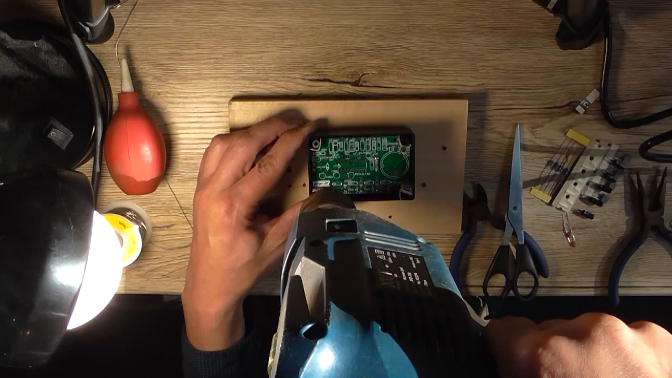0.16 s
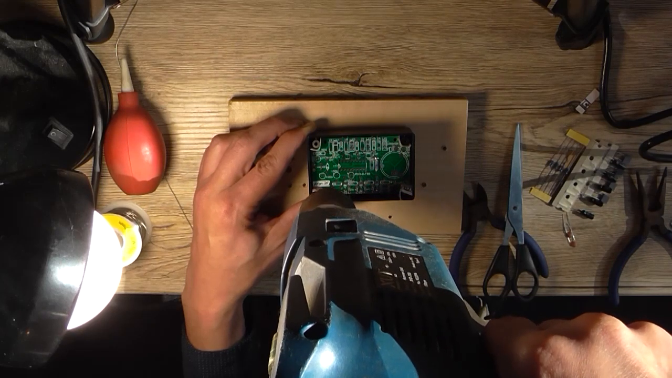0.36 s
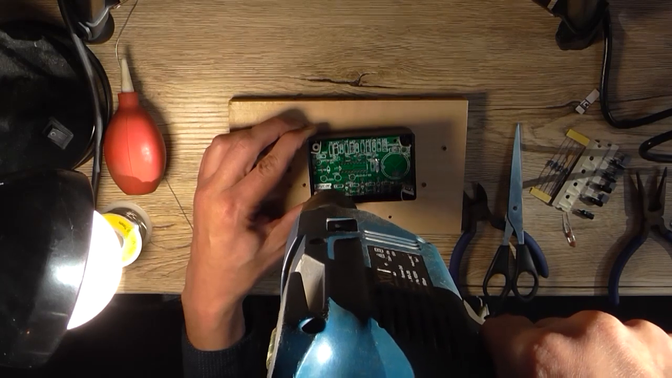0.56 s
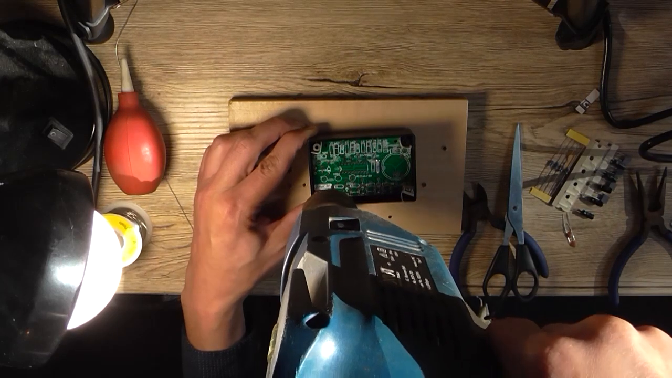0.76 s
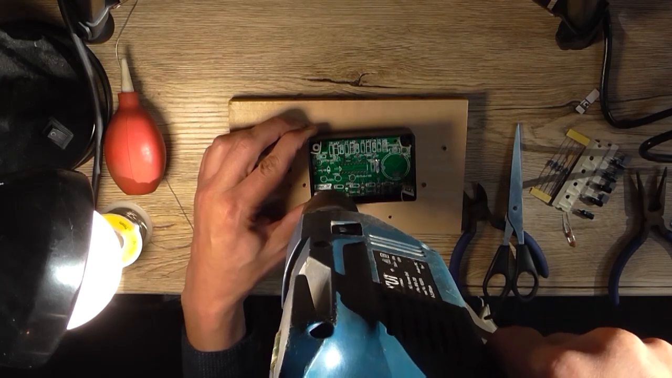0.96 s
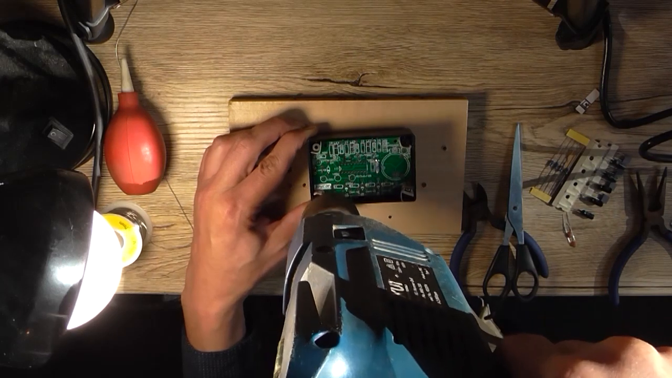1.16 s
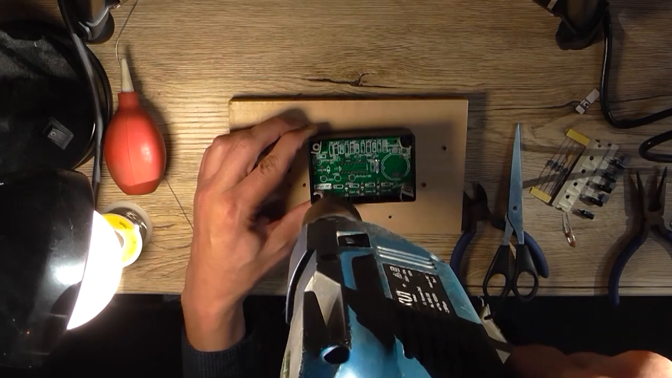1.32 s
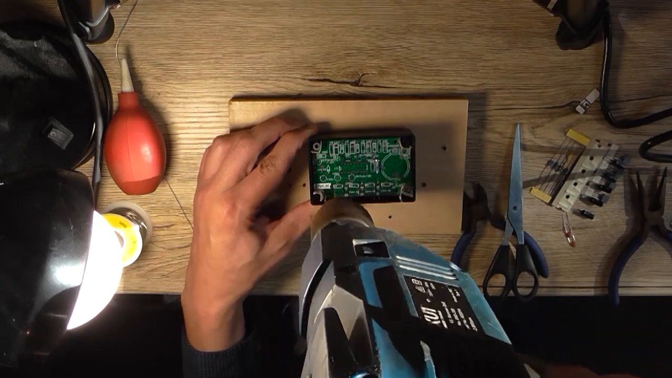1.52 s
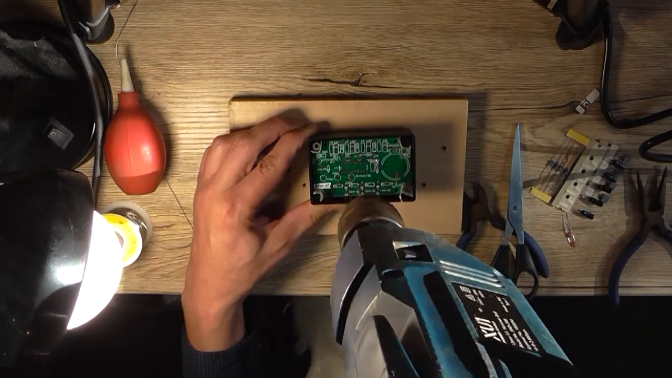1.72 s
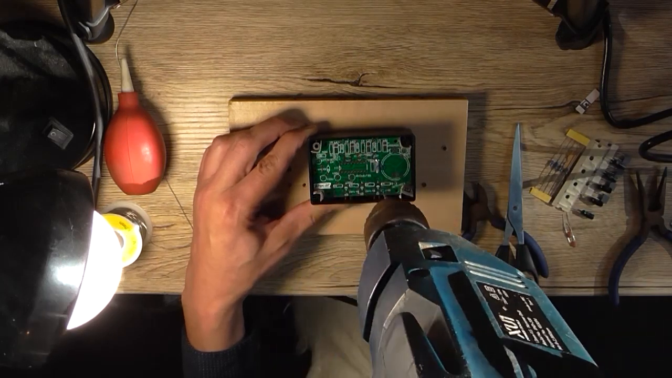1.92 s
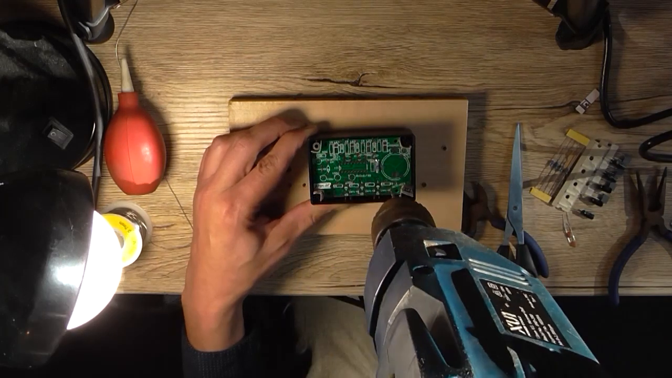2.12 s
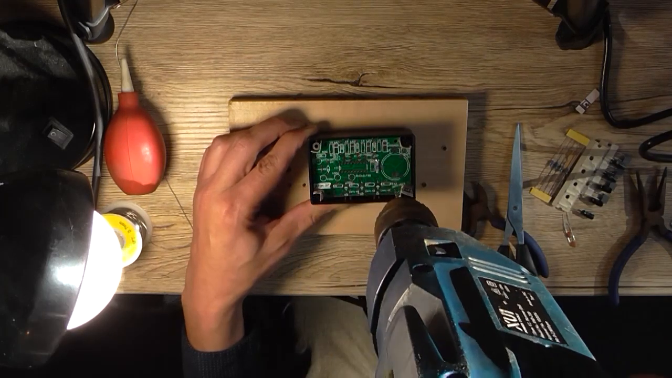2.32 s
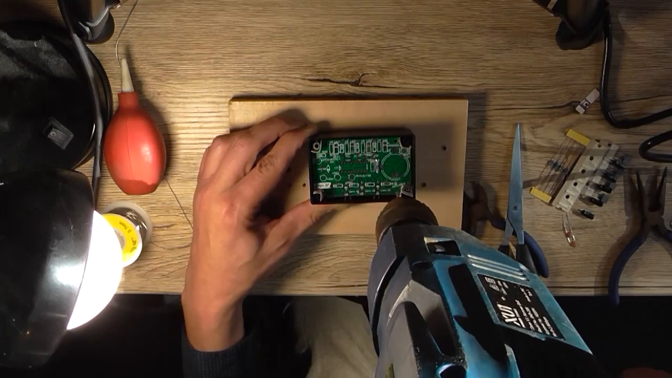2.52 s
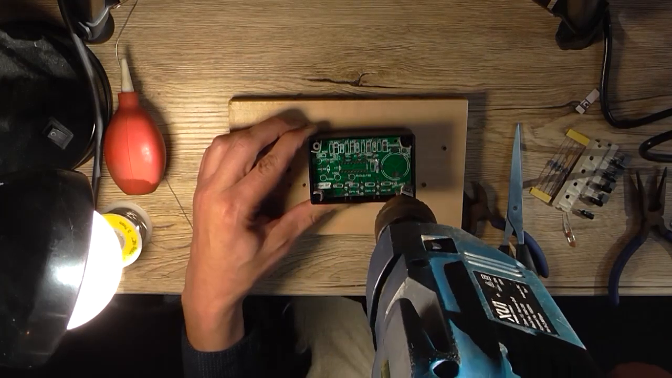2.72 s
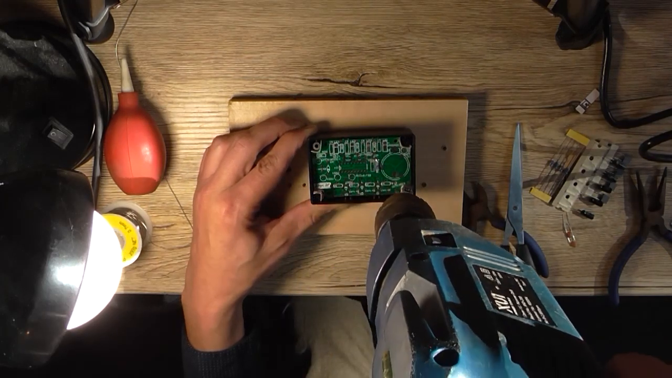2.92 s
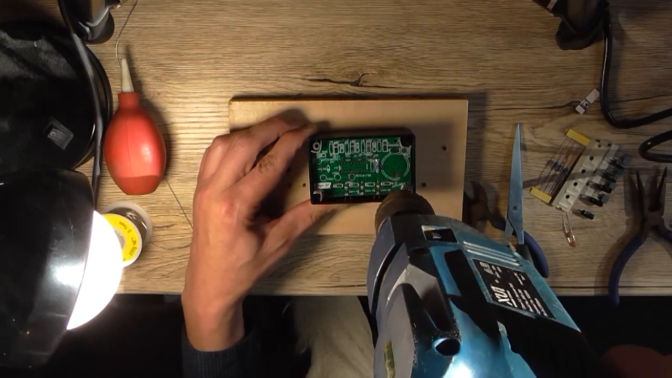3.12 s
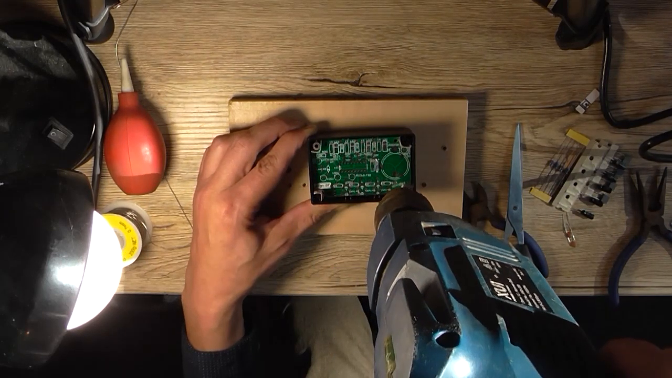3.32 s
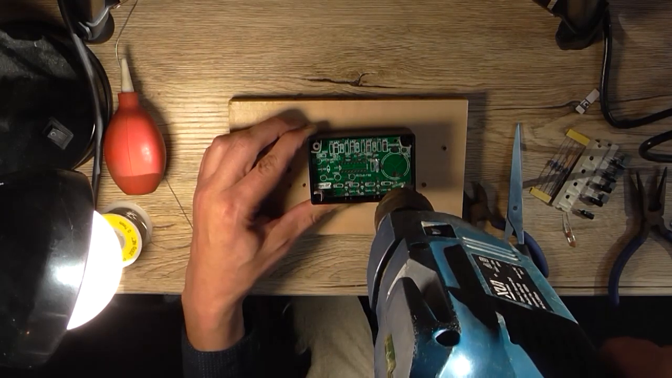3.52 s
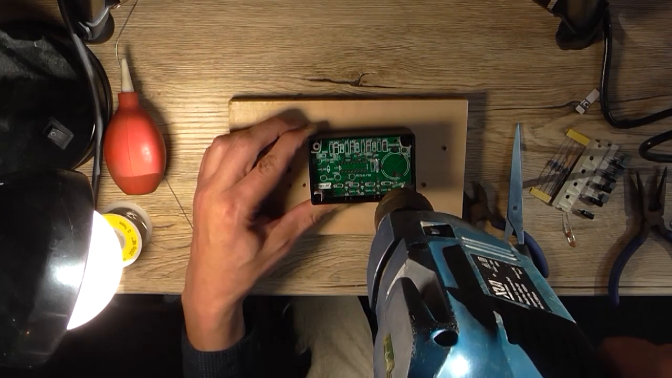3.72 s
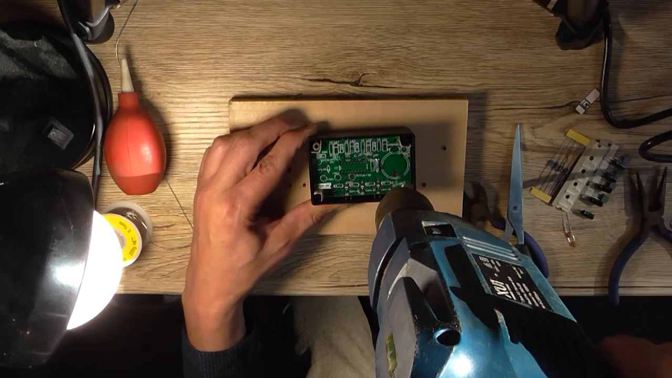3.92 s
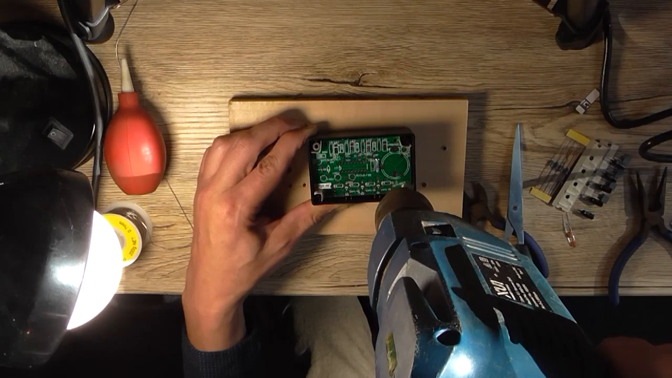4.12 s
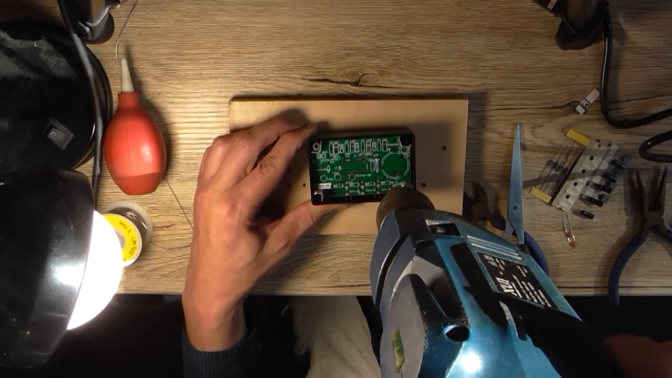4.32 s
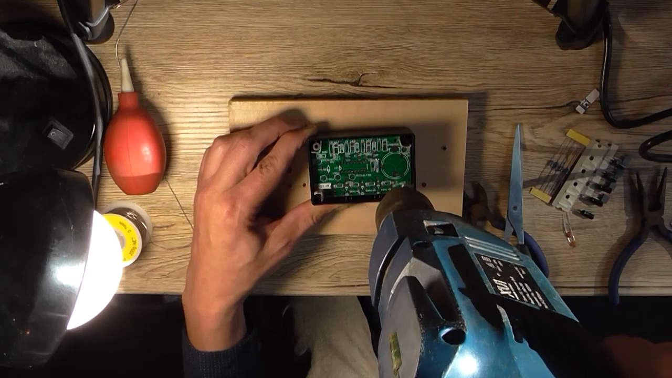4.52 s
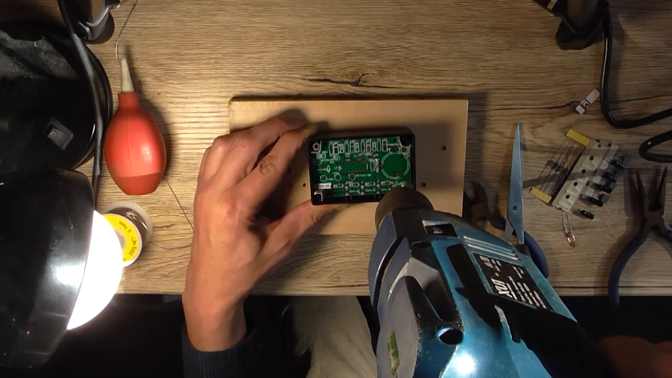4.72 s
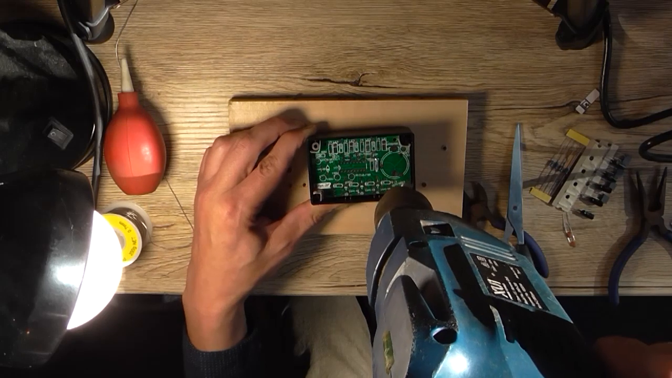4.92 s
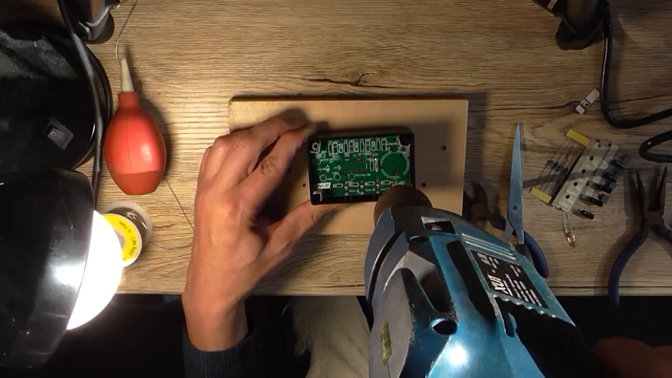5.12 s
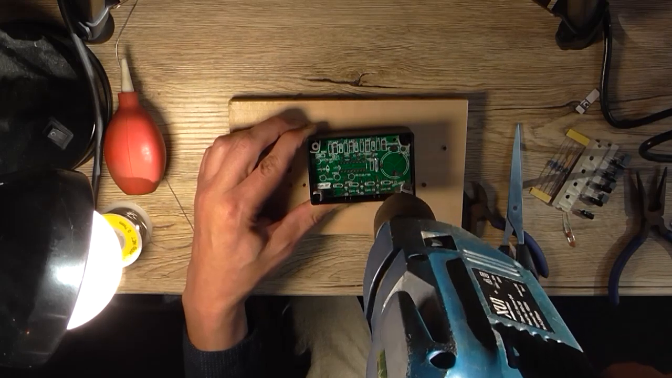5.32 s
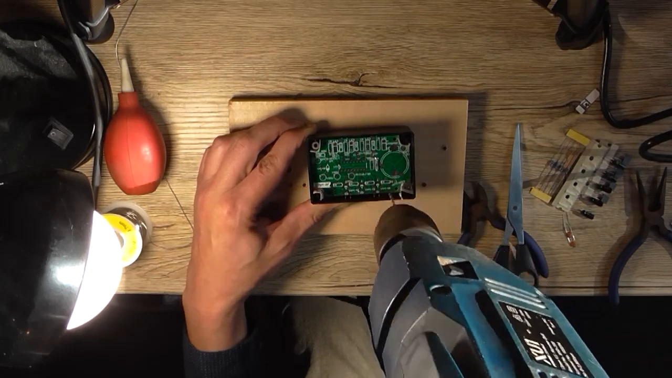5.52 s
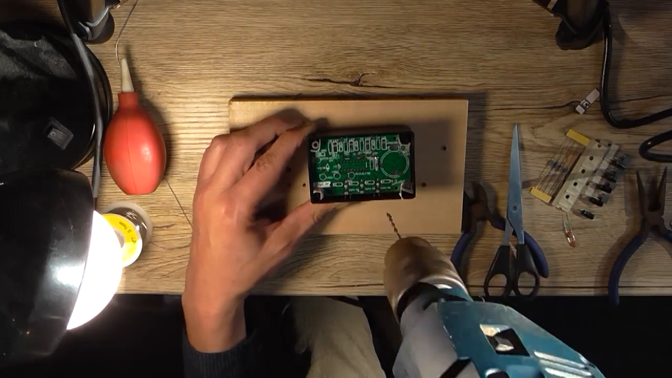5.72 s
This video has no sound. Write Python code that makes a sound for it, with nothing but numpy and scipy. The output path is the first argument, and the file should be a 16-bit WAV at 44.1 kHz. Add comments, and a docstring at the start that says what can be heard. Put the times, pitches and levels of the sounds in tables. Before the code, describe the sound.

A corded electric drill whines up and coasts down while boring a plastic box, then scrapes, knocks on the bench, and drills again.

```python
"""At a wooden bench, a corded hand drill bores a plastic box in two bursts, close to the microphones. Gear
teeth and armature slots whine through the housing as the rotor speeds up and coasts: sines locked to its turns,
over resonant noise. The loaded bit shakes the bench as low noise. Between the bursts the bit scrapes over the
box (grainy noise swells) and the drill is set down (ringing wood modes). Jolts, a faint two-band hiss that
swells near 2 s, and room noise with mains hum complete it."""
import sys
import numpy as np
from scipy import signal
from scipy.fft import rfft, irfft, next_fast_len
from scipy.io import wavfile
from scipy.ndimage import uniform_filter1d, map_coordinates

SR = 44100
rng = np.random.default_rng(int(sys.argv[2]) if len(sys.argv) > 2 else 0)


def transcribe(u):
    """Save the signal u as a 16-bit wav file named by the first command-line argument.

    u: samples, shape (n,) or (channels, n), limited to [-1, 1]; the rate is SR.
    q: integer samples, one column per channel.
    """
    v = np.clip(np.atleast_2d(u).T, -1, 1)
    q = np.round(v * 32767).astype(np.int16)
    wavfile.write(sys.argv[1], SR, q)


N = 253575
HOP, SIZE = 256, 1024  # STFT, samples
T = np.arange(N // HOP + 5) * HOP / SR  # frame times, s
HZ = np.fft.rfftfreq(SIZE, 1 / SR)  # bin frequencies
FULL_MESH_HZ = 700  # gear mesh at full speed
PINION_TEETH = 5
# resonances of housing, box and bench: (frequency [Hz], width [Hz], lift [dB])
BODY = [(129, 8.3, 12.5), (200, 21, 7.5), (260, 27, -8.5), (300, 72, -2.5), (344, 6.7, -6), (459, 45, 8.5),
        (578.3, 21.3, 16.5), (695, 8.9, 2), (1290, 150, 4.5), (1650, 130, 6), (1940, 19, 6.5),
        (2205, 66, 9.5), (2885, 15.5, 5), (3382, 33, 9), (7030, 27, 1.5), (7770, 280, 4)]


def amp(db):
    """Decibels to gain."""
    return 10 ** (np.asarray(db) / 20)


def evened(x):
    """Scales to rms 1."""
    return x / np.sqrt(np.mean(x ** 2) + 1e-20)


def read(points, hz):
    """Reads a spectrum table on a log frequency axis."""
    f, value = np.transpose(points)
    return np.interp(np.log(hz + 1), np.log(f + 1), value)


def colour(spectrum, modes):
    """Power per bin, sum 1: a broad spectrum lifted at each resonance."""
    lift_db = sum(db / (1 + (2 * (HZ - hz) / width) ** 2) for hz, width, db in modes)
    power = amp(read(spectrum, HZ) + lift_db) ** 2
    return (power / power.sum())[:, None]


def curve(tables, t):
    """The tables of one control, joined over time."""
    s, value = np.vstack(tables).T
    return np.interp(t, s, value)


def wander(count, frames):
    """Smoothed random drift of rms 1, one row a source."""
    drift = rng.standard_normal((len(T), count))
    return evened(uniform_filter1d(drift, max(round(frames), 1), 0)).T


def noise(power, patchy_db, wide=1):
    """Stereo noise from a bins x frames power field with drifting patches."""
    # (frequency [Hz], left-right likeness [0-1])
    likeness = [(60, 0.9), (100, 0.89), (180, 0.72), (310, 0.72), (550, 0.89), (950, 0.58), (1650, 0.89),
                (2860, 0.93), (4970, 0.96), (8640, 0.82), (15000, 0.66)]
    a, b, c, d, patches = rng.standard_normal((len(T), len(HZ), 5)).T
    patches = evened(uniform_filter1d(uniform_filter1d(patches, 10, 0), 8, 1))
    same = read(likeness, HZ)[:, None] ** wide
    left, other = a + 1j * b, c + 1j * d
    pair = np.array([left, same * left + np.sqrt(1 - same ** 2) * other])
    pair = pair * np.sqrt(power) * amp(patchy_db * patches)
    sound = signal.istft(pair, nperseg=SIZE, noverlap=SIZE - HOP)[1][:, :N]
    return sound * np.sqrt(3 / 2)  # overlap of independent frames loses power


def drill_controls():
    """Gear mesh frequency, bit load and motor current per frame."""
    # rotor speed, one table a burst: (time [s], gear mesh [Hz])
    speed = [
        [(0.0, 178.3), (0.058, 160.3), (0.112, 209.5), (0.28, 394), (0.48, 565.2), (0.69, 669.5),
         (0.788, 704.5), (0.88, 657), (1.29, 369.8), (1.62, 199.6), (1.94, 64.7)],
        [(3.892, 203.4), (4.03, 270.8), (4.144, 335.5), (4.29, 245), (4.42, 181.5), (4.46, 187.8),
         (4.54, 275.1), (4.662, 383), (4.848, 543.9), (5.076, 649.6), (5.304, 743), (5.408, 743),
         (5.682, 541.6), (5.75, 507)],
    ]
    # how hard the bit bites, one table a burst: (time [s], load [0-1])
    bite = [
        [(0.0, 0.67), (0.13, 1), (0.33, 0.81), (0.56, 0.73), (0.78, 0.7), (0.9, 0.31), (1.4, 0.16), (1.94, 0)],
        [(3.892, 0.22), (4.02, 0.74), (4.15, 0.51), (4.22, 0.64), (4.5, 0.94), (4.75, 0.7), (5.23, 0.59),
         (5.29, 0.45), (5.75, 0.01)],
    ]
    # current flows: (from [s], to [s])
    trigger = [(.06, .82), (3.89, 3.93), (4.44, 5.3)]
    mesh_hz = uniform_filter1d(curve(speed, T), size=7)  # the rotor's mass rounds the turns
    current = uniform_filter1d(sum((T > a) & (T < b) for a, b in trigger) * 1., 5)
    return mesh_hz, curve(bite, T), current


def drill_field(mesh_hz, load, current, octaves):
    """Power of whirr, gearbox drone and shaken bench, all shaped by the body resonances."""
    # spectra: (frequency [Hz], relative level per Hz [dB])
    whirr = [(1290, -69), (2200, -42), (2490, -31), (2850, -10.5), (3390, -6), (3740, -4), (4610, -0.5),
             (6160, -3), (8510, -9.5), (12100, -4), (14100, -13.5), (15200, -11.5), (16000, -26)]
    drone = [(24, -77), (40, -26), (123, -23.5), (162, -29), (187, -8), (246, -16), (298, -1.5), (379, -25),
             (584, -1.5), (707, -3.5), (798, -7), (932, -8.5), (1490, -6.5), (2210, -14.5), (2500, -13),
             (3250, -12), (5500, -120)]
    bench = [(35, -56), (60, -44), (124, -42.5), (161, -50), (189, -13), (220, -21), (286, 6.5), (343, 2.5),
             (422, 2.5), (493, -16.5), (520, -18.5), (680, -34), (1140, -120)]
    # (gear mesh [Hz], whirr level [dB] without current at full-speed tilt)
    whirr_by_speed = [(65, -70), (100, -46.5), (145, -33), (190, -29), (290, -26.5), (450, -27),
                      (740, -27.5)]
    whirr_db = read(whirr_by_speed, mesh_hz) + 1 * current
    bin_hz = HZ[:, None]
    tilt_db = 2.0 * np.log2(np.maximum(bin_hz, 1) / 5000) * octaves.clip(-2.1)  # fast air is brighter
    rattle_db = -4.9 * octaves.clip(-1.1) / (1 + ((bin_hz - 4600) / 600) ** 2)  # slow teeth, housing
    growl_db = -3 * octaves.clip(-1.5) / (1 + ((bin_hz - 640) / 90) ** 4)  # slow gearbox
    drone_db = whirr_db + growl_db - 11 + 5.5 * load
    bench_db = -63.5 + 38.5 * load
    field = colour(whirr, BODY) * amp(whirr_db + tilt_db + rattle_db + 0.17 * wander(1, 4)) ** 2
    field += colour(drone, BODY) * amp(drone_db + 1.0 * wander(1, 5)) ** 2
    return field + colour(bench, BODY) * amp(bench_db + 4.2 * wander(1, 5)) ** 2


def tooth_heights(mesh_hz, load, octaves):
    """Tooth tone and its octave: loaded teeth mesh hard, free teeth lose their tone when slow."""
    # as the housing sounds them: (tone [Hz], amplitude [dB]), free before the slow-speed loss
    teeth_hard = [(170, -58), (230, -34), (290, -30.5), (340, -27), (420, -25), (520, -29.5), (640, -30),
                  (750, -38), (1000, -39.5), (1330, -27.5), (1500, -44)]
    teeth_free = [(170, -67), (330, -53.5), (430, -46), (540, -32), (690, -31), (760, -36.5), (800, -60),
                  (1500, -64)]
    hard = np.clip((load - .3) / (.65 - .3), 0, 1)
    heights = {}
    for k in (1, 2):
        free_db = read(teeth_free, k * mesh_hz) + 4 * octaves
        heights[PINION_TEETH * k] = amp(hard * read(teeth_hard, k * mesh_hz) + (1 - hard) * free_db)
    return heights


def order_heights(field, mesh_hz, current, octaves):
    """Rotor orders stand over the noise around them as the housing radiates them."""
    # unbalance, sidebands of the pinion teeth and multiples of the twelve slots:
    # (rotor order [per turn], level over noise before radiation [dB], extra under current [dB])
    orders = [(1, 6, 1), (4, 4, 2), (6, 1, 1), (11, 3, 3), (12, 5, 9), (13, 8, 4), (15, 11, 2), (16, 9, 3),
              (20, 9, 0), (22, 9, 0), (23, 9, 0), (24, 12, 0), (25, 8, 0), (29, 8, 0), (30, 8, 0),
              (34, 6, 0), (36, 11, 0), (37, 10, 0), (38, 9, 0), (42, 10, 0), (47, 9, 0), (48, 13, 0),
              (49, 13, 0), (50, 10, 0), (60, 7, 0), (61, 10, 0), (62, 8, 0)]
    # how well the housing radiates a tone: (frequency [Hz], gain [dB])
    radiation = [(60, -6), (130, 0), (300, -2), (520, 2), (700, 2), (790, -10), (1300, -2), (1750, 0),
                 (1900, -9), (2900, 0), (3600, 1), (5500, 2), (5800, -9), (8000, -2)]
    heights = {}
    for order, db, driven_db in orders:
        hz = order * mesh_hz / PINION_TEETH
        around = np.sqrt(map_coordinates(field, [hz / HZ[1], np.arange(len(T))], order=1))
        clear_db = 4 * octaves * np.clip(hz / 800 - 1, 0, 1)  # slow: upper tones sink into noise
        heights[order] = around * amp(db + driven_db * current + read(radiation, hz) + clear_db)
    return heights


def rotor_tones(heights, turns, octaves):
    """Sines locked to the rotor's turns, fluttering in level and left-right balance."""
    t, count, out = np.arange(N) / SR, len(heights), np.zeros((2, N))
    flutter_db, pan_db, start = 3.2 * wander(count, 8), 1.0 * wander(count, 20), rng.random(count)
    flutter_db[:2] *= .35 - .6 * octaves.clip(-1.5, 0)  # tooth tones steady at speed, fitful when slow
    for k, (order, height) in enumerate(heights.items()):
        tone = np.sin(2 * np.pi * (order * turns + start[k]))
        out[0] += np.interp(t, T, height * amp(flutter_db[k] + pan_db[k])) * tone
        out[1] += np.interp(t, T, height * amp(flutter_db[k] - pan_db[k])) * tone
    return out


def magnetic_hum(current, octaves):
    """Magnetic hum under current; a slow rotor draws most."""
    # (frequency [Hz], amplitude at full speed before drift [dB])
    buzz = [(100, -58), (200, -46.5)]
    t = np.arange(N) / SR
    draw = current * amp(-4.0 * octaves + 2.5 * wander(1, 8)[0])
    return np.interp(t, T, draw) * sum(amp(db) * np.sin(2 * np.pi * hz * t) for hz, db in buzz)


def drill():
    """Rotor orders and rough noise share one body; current adds hum and slot whine."""
    # drill sounds: (from [s], to [s])
    bursts = [(0, 1.94), (3.892, 5.75)]
    t = np.arange(N) / SR
    mesh_hz, load, current = drill_controls()
    octaves = np.log2(mesh_hz / FULL_MESH_HZ)  # negative when slow
    field = drill_field(mesh_hz, load, current, octaves)
    jittered_hz = mesh_hz * (1 + .003 * wander(1, 2)[0])
    turns = np.cumsum(np.interp(t, T, jittered_hz)) / SR / PINION_TEETH
    # the rotor runs a little out of true
    wobble = 1 + 0.062 * np.cos(2 * np.pi * turns) + 0.077 * np.cos(4 * np.pi * turns)
    heights = tooth_heights(mesh_hz, load, octaves)
    heights.update(order_heights(field, mesh_hz, current, octaves))
    out = noise(field, patchy_db=0.88) * wobble
    out += rotor_tones(heights, turns, octaves) + magnetic_hum(current, octaves)
    return out * uniform_filter1d(sum((t >= a) & (t <= b) for a, b in bursts) * 1., 100)


def scrape():
    """Each slip or catch is a swell of grainy friction ringing in bit and chuck."""
    # the bit slips over the box: (peak time [s], level [dB], fall [s])
    slips = [(2.6, -42.5, 0.013), (2.639, -51, 0.024), (2.685, -51, .019), (2.752, -54.5, 0.015),
             (2.797, -51.5, 0.014), (2.893, -48.5, 0.0098), (2.952, -46.5, 0.026), (3.001, -47, 0.017),
             (3.028, -43.5, 0.017), (3.039, -43, 0.017), (3.096, -44, 0.021), (3.136, -43, 0.019),
             (3.15, -40.5, .009), (3.171, -39, 0.016), (3.187, -39, 0.0093), (3.211, -45, 0.037),
             (3.3, -41.5, 0.03), (3.335, -41.5, 0.032), (3.372, -44.5, .013)]
    # the tip catches on an edge with a sudden start: (peak time [s], level [dB], fall [s])
    catches = [(2.574, -42.5, .005), (2.776, -53, .013), (2.932, -52, 0.0083), (3.088, -50, 0.013),
               (3.283, -49, .009)]
    # (frequency [Hz], relative level per Hz [dB])
    friction = [(350, -38), (600, -14), (1010, -15), (2180, -9.5), (2570, -14), (4280, -19), (4910, -10),
                (6550, -25), (12200, -26), (16000, -35)]
    # resonances of bit and chuck: (frequency [Hz], width [Hz], lift [dB])
    bit = [(1776, 110, 9), (2200, 22, 11.5), (3190, 100, 15), (3970, 250, 11), (4830, 730, 10.5),
           (5600, 70, 12), (6040, 270, 7), (7530, 180, 10), (9740, 580, 12.5), (12100, 650, 12.5)]
    t, power = np.arange(N) / SR, np.zeros(N)
    swells = [(s, db, fall, .5 * fall) for s, db, fall in slips]
    swells += [(s, db, fall, .001) for s, db, fall in catches]
    for s, db, fall_s, rise_s in swells:
        distance = np.where(t < s, (s - t) / rise_s, (t - s) / fall_s)
        power += amp(db) ** 2 * np.exp(-2 * distance)
    grain = amp(2.2 * evened(uniform_filter1d(rng.standard_normal(N), 30)))
    return np.sqrt(power) * grain * noise(colour(friction, bit) * np.ones(len(T)), patchy_db=2.0, wide=1.3)


def knocks():
    """Every blow rings the same bench modes, slightly detuned by where it lands."""
    # (time [s], level [dB], brightness: mode lift at 1600 Hz over 200 Hz [dB])
    blows = [(1.786, -42.5, 31), (1.822, -44, 22), (2.532, -52, -17), (2.58, -38.5, 5), (2.61, -36, -2),
             (2.796, -46, 0), (2.994, -47, -7), (3.281, -45, 13.5), (3.378, -25, -10.5), (3.42, -37.5, -8),
             (3.463, -35.5, -2), (3.897, -28, -36)]
    # bench modes: (frequency before detuning [Hz], relative level [dB], t60 [s])
    wood = [(133, -20.5, 0.12), (214, -3.5, 0.15), (297, -6, 0.11), (429, -12, 0.14), (866, -0.5, 0.015),
            (1310, -8.5, 0.047), (1890, -29, 0.062)]
    out, t = np.zeros(N), np.arange(SR // 4) / SR
    detune = 1 + 0.012 * rng.standard_normal((len(blows), len(wood)))
    for (s, db, bright_db), shift in zip(blows, detune):
        ring = np.zeros(len(t))
        for (hz, mode_db, t60), k in zip(wood, shift):
            level_db = mode_db + bright_db * np.log2(hz / 200) / 3 - 60 * t / t60
            ring += amp(level_db) * np.sin(2 * np.pi * hz * k * t)
        out[round(s * SR):][:len(t)] += amp(db) * ring * (1 - np.exp(-t / .0012))
    return out


def jolts():
    """Each pull and release of the trigger jolts the tool and rocks the bench in low decaying modes."""
    # (time [s], level [dB])
    switch_jolts = [(0.084, -33), (0.739, -38), (3.9, -34), (5.13, -40), (5.21, -37)]
    # (frequency [Hz], relative level [dB], t60 [s])
    modes = [(70, -12, 0.27), (98, -3.5, 0.3), (127, 8, 0.15)]
    out, t, rise_s = np.zeros(N), np.arange(SR // 4) / SR, 0.013
    for s, db in switch_jolts:
        rock = np.zeros(len(t))
        for hz, mode_db, t60 in modes:
            rock += amp(mode_db - 60 * t / t60) * np.sin(2 * np.pi * (hz * t + rng.random()))
        out[round(s * SR):][:len(t)] += amp(db) * rock * (1 - np.exp(-t / rise_s))
    return out


def two_band_hiss():
    """A faint two-band hiss, present from the start, that swells near 2 s and then fades: narrow noise bands."""
    # (frequency [Hz], width [Hz], lift [dB])
    bands = [(1980, 520, 15), (4330, 480, 19)]
    # (time [s], level [dB])
    level = [(1.85, -67), (1.95, -60.5), (2.07, -59), (2.43, -69), (2.56, -70), (2.7, -95)]
    base = [(1000, -10), (2000, 0), (3000, -8), (5000, 0), (9000, -15)]  # (Hz, relative dB per Hz)
    return noise(colour(base, bands) * amp(curve([level], T)) ** 2, patchy_db=1.5)


def room():
    """Quiet room noise with wavering mains hum."""
    # (frequency [Hz], relative level per Hz [dB])
    air = [(15, -68), (25, -28), (59, -9.5), (263, -5), (285, -6), (394, -1.5), (545, -7), (591, -11),
           (641, -11), (1020, -8.5), (2160, -24.5), (2840, -26.5), (16000, -29)]
    # mains hum: (frequency [Hz], amplitude before a common 3.5 dB lift [dB])
    mains = [(301.5, -65), (398.4, -84), (500.6, -71.5), (597.5, -72.5), (899.0, -83), (1001, -76.5),
             (1200, -80), (1297, -79), (2099, -81.5)]
    t, waver, hum = np.arange(N) / SR, amp(2.5 * wander(len(mains), 20)), np.zeros(N)
    for (hz, db), w in zip(mains, waver):
        hum += amp(db + 3.5) * np.interp(t, T, w) * np.sin(2 * np.pi * (hz * t + rng.random()))
    power = colour(air, []) * amp(-57.5 + .4 * wander(1, 12)) ** 2
    return hum + noise(power, patchy_db=.8, wide=5)


def scene():
    """All sources on the bench, and the room."""
    return drill() + scrape() + knocks() + jolts() + two_band_hiss() + room()


def record(dry):
    """The microphone pair leans with frequency; then the band limit."""
    # (frequency [Hz], left minus right [dB])
    balance = [(60, -3), (180, -3.5), (550, -2), (1650, 0.0), (4970, 0.5), (15000, -1)]
    edge_hz = 15750
    size = next_fast_len(N + SR // 10)
    lean = amp(read(balance, np.fft.rfftfreq(size, 1 / SR)) / 2)
    pair = irfft(rfft(dry, size) * [lean, 1 / lean], size)[:, :N]
    low_pass = signal.firwin(511, edge_hz, window=("kaiser", 9), fs=SR)
    return signal.oaconvolve(pair, low_pass[None], "same")


dry = scene()
out = record(dry)
transcribe(out)
```